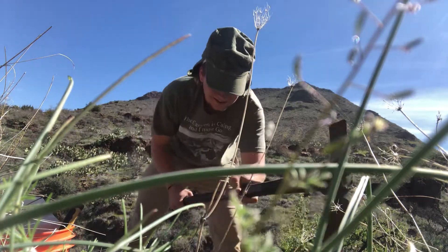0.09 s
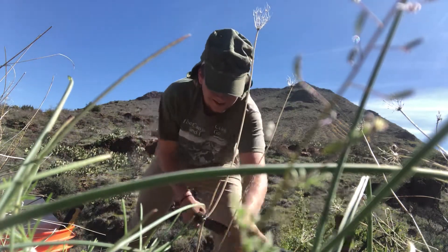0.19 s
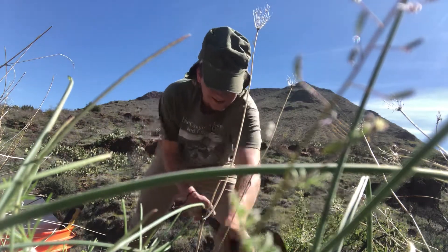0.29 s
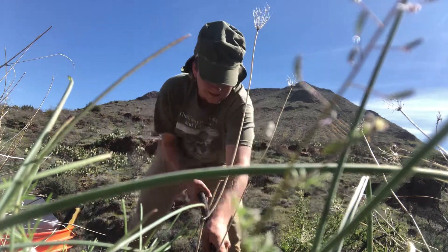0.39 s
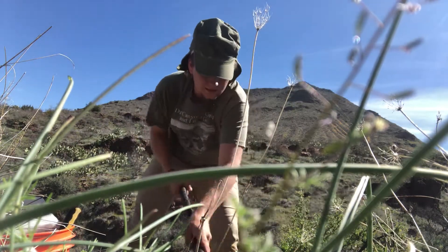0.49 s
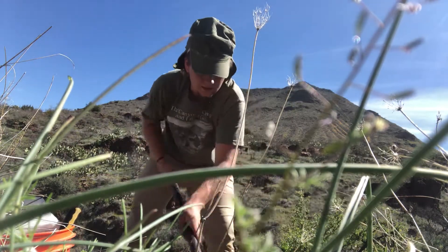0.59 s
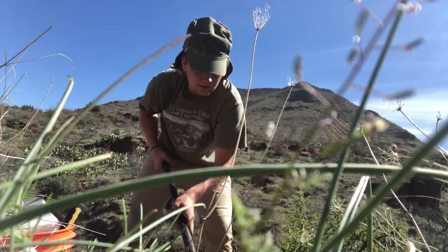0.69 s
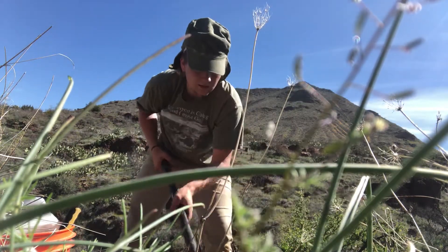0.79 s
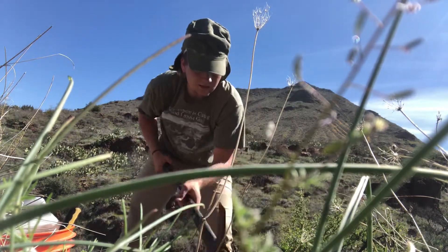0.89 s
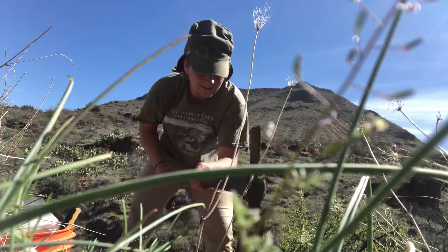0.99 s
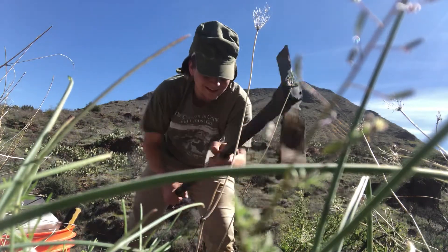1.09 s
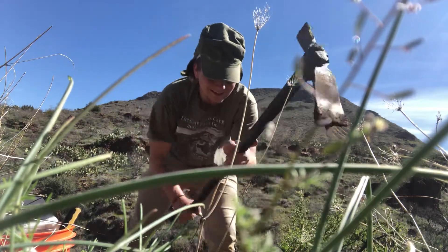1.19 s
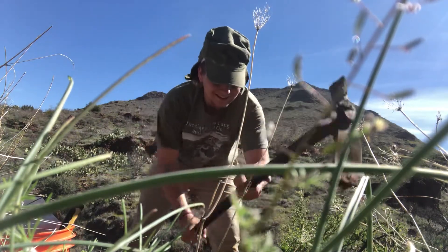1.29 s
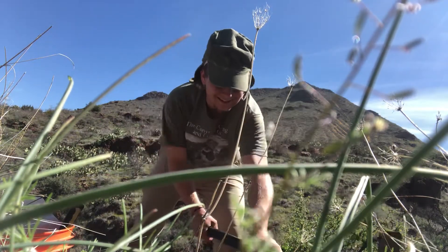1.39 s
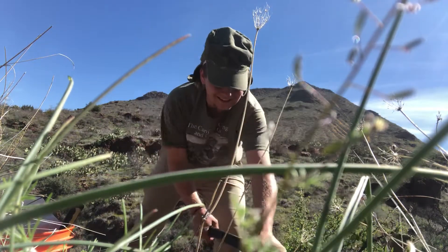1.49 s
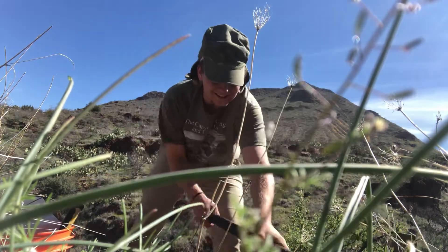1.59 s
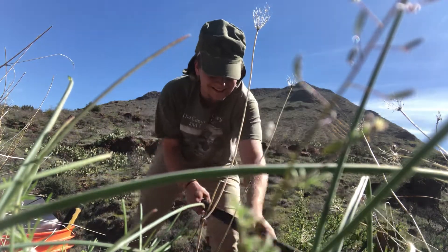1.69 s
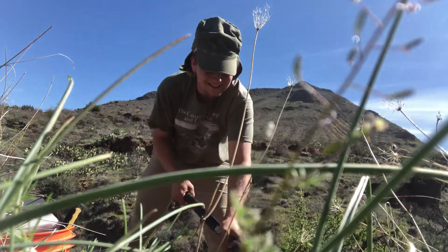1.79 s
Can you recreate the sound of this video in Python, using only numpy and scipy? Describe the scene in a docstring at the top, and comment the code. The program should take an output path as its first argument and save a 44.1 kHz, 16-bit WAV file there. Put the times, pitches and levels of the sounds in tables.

```python
"""Pick on stony ground

An open hillside in almost still air, the microphone close to the digging and a small bird far off.
A pick bites twice: noise bursts for the steel crack, damped sines for the thud, a slow swell for the shudder.
After each blow the blade drags through grit, made of dense tiny contacts that also ring its steel.
Loose stones knock as short bell-coloured bursts; the bird is a run of short arched sine notes.
"""
import sys
import numpy as np
from scipy import signal
from scipy.fft import rfft, irfft, next_fast_len
from scipy.io import wavfile

SR = 44100
rng = np.random.default_rng(int(sys.argv[2]) if len(sys.argv) > 2 else 0)


def persist_wave(psi):
    """Save psi, clipped to +-1, as 16-bit WAV."""
    counts = np.round(np.clip(psi, -1, 1) * 32767).astype(np.int16)
    wavfile.write(sys.argv[1], SR, np.atleast_2d(counts).T)


N = 79380  # samples, 1.8 s
T = np.arange(N) / SR  # time [s]


def amp(db):
    """Decibels to gain."""
    return 10 ** (np.asarray(db) / 20)


def unit(x):
    """Scale to rms 1."""
    return x / np.sqrt(np.mean(x ** 2) + 1e-20)


def spectrum(points):
    """Gain as a function of frequency, from (frequency [Hz], level [dB]) points on a log axis."""
    f, db = np.transpose(points)
    return lambda hz: amp(np.interp(np.log(hz), np.log(f), db))


def bell(hz, octaves):
    """Gain as a function of frequency: a bell around one pitch."""
    return lambda f: np.exp(-.5 * (np.log2(f / hz) / octaves) ** 2)


def filtered(x, response):
    """Shape x by a gain that depends on frequency, padded so that nothing wraps round."""
    m = next_fast_len(N + SR // 2)
    gain = response(np.fft.rfftfreq(m, 1 / SR) + 1)  # 1 Hz up, to avoid log(0)
    return irfft(rfft(x, m) * gain, m)[:N]


def coloured(x, points):
    """Give x a spectral colour and scale it to rms 1."""
    return unit(filtered(x, spectrum(points)))


def struck(s, rise, t60):
    """Envelope of a contact: quick rise, then a decay of 60 dB per t60 seconds."""
    t = np.maximum(T - s, 0)
    return (1 - np.exp(-t / rise)) * np.exp(-np.log(1000) * t / t60)


def swell(s, spread):
    """Bell-shaped envelope; the spread is its standard deviation in seconds."""
    return np.exp(-.5 * ((T - s) / spread) ** 2)


def burst(response, envelope):
    """Short noise burst of a given colour, with the envelope's energy."""
    half_envelope = np.sqrt(envelope)
    z = rfft(rng.standard_normal(N) * half_envelope)
    flat = z / (np.abs(z) + 1e-12)  # keep the random phases, level the magnitudes
    gain = response(np.fft.rfftfreq(N, 1 / SR) + 1)
    x = irfft(flat * gain, N) * half_envelope
    return unit(x) * np.sqrt(np.mean(envelope ** 2))


def grains():
    """Dense tiny contacts, each with its own pitch and size, partly in clumps."""
    z = signal.stft(rng.standard_normal(N), nperseg=128)[2]
    single_db = 6.5 * np.clip(rng.standard_normal(z.shape), -2, 2)
    clump_db = 3.5 * rng.standard_normal(z.shape[1])  # shared by grains that break together
    return signal.istft(z * amp(single_db + clump_db))[1][:N]


# Colour of the quiet hillside air: (frequency [Hz], level [dB])
AIR_COLOUR = [(15, -45.5), (25, -23.5), (76, -1), (166, -3.5), (200, -10), (236, -0.5), (256, -8),
              (326, -13), (354, -6), (1890, -23.5), (4870, -23), (8360, -28.5), (16000, -33)]
# Slow course of the air: (time [s], level [dB])
AIR_LEVEL = [(0, -63), (.2, -60), (.7, -60.5), (1.0, -65.5), (1.25, -65.5), (1.45, -61), (1.8, -62.5)]
# Dry stalks and trickling dirt: (centre time [s], level [dB], spread [s])
RUSTLES = [(0.012, -59.5, 0.019), (0.107, -57, 0.023), (0.921, -63.5, 0.018), (1.303, -63, 0.018)]
# Colour of the rustles: (frequency [Hz], level [dB])
RUSTLE_COLOUR = [(100, -9), (500, 4.5), (1500, -4), (4000, -8.5), (8000, -16.5), (16000, -21.5)]
# Faint high whispers: (centre time [s], level [dB], spread [s], frequency [Hz])
WHISPERS = [(1.124, -71, 0.031, 5150), (1.306, -65, 0.021, 6530)]


def hillside():
    """Air as steady coloured noise, rustles as swelling grains, whispers as swelling narrow noise."""
    air_level = amp(np.interp(T, *np.transpose(AIR_LEVEL)))
    out = air_level * coloured(rng.standard_normal(N), AIR_COLOUR)
    rustle_level = sum(amp(db) * swell(s, spread) for s, db, spread in RUSTLES)
    out += rustle_level * coloured(grains(), RUSTLE_COLOUR)
    for s, db, spread, hz in WHISPERS:
        whisper = unit(filtered(rng.standard_normal(N), bell(hz, octaves=0.33)))
        out += amp(db) * swell(s, spread) * whisper
    return out


# Far-off bird, mostly alternating high and low: (time [s], top frequency [Hz], level [dB])
BIRD_NOTES = [(1.474, 4750, -67), (1.486, 3990, -69), (1.501, 4900, -70), (1.514, 4150, -61.5),
              (1.530, 4950, -71), (1.544, 4160, -62), (1.560, 4670, -61), (1.573, 4100, -60),
              (1.588, 4700, -69), (1.762, 4750, -60), (1.775, 4220, -58)]
NOTE_SPREAD_S, NOTE_ARCH_HZ = 0.0029, 81.6  # bell spread; pitch drop at one spread from the middle


def bird():
    """Short sine notes whose pitch arches up to the middle and falls again."""
    out = np.zeros(N)
    for s, hz, db in BIRD_NOTES:
        arch = np.minimum(((T - s) / NOTE_SPREAD_S) ** 2, 10)
        pitch = hz - NOTE_ARCH_HZ * arch
        out += amp(db) * swell(s, NOTE_SPREAD_S) * np.sin(2 * np.pi * np.cumsum(pitch) / SR)
    return out


SLOPE_DB, SLOPE_T60_S = -38, .25


def slope_scatter(x):
    """Weak, dull answer from the rough slope: the digging convolved with decaying noise."""
    colour = [(60, -1), (500, -1.5), (2000, -9.5), (12000, -19.5)]  # (frequency [Hz], level [dB])
    tail = coloured(rng.standard_normal(N), colour) * struck(0, 0.0033, SLOPE_T60_S)
    return amp(SLOPE_DB) * signal.fftconvolve(x, tail / np.linalg.norm(tail))[:N]


# Steel modes of the blade: (frequency [Hz], relative level [dB], t60 [s])
BLADE_MODES = [(3000, -6.5, 0.049), (3520, -4, .035), (4540, -3, .045), (5380, 0, 0.042), (5830, -5, .04),
               (7620, -5.5, 0.041)]
CONTACT_RISE_S = 0.00038  # steel or grit contact


def scrape(rows, grit_colour, grit_db, earth_colour, earth_db, ring_db):
    """Grit grinds along the blade and rings it, over the duller crunch of earth."""
    s, *levels = np.transpose(rows)
    # near silence outside the stroke
    grit_level, earth_level = [amp(np.interp(T, s, db, left=-120, right=-120)) for db in levels]
    contacts = grains()
    steel = np.zeros(N)
    for hz, db, t60 in BLADE_MODES:
        steel += amp(db) * np.sin(2 * np.pi * hz * T) * struck(0, CONTACT_RISE_S, t60)
    ringing = unit(signal.fftconvolve(contacts, steel)[:N])
    grit = unit(coloured(contacts, grit_colour) + amp(ring_db) * ringing)
    earth = coloured(grains(), earth_colour)
    return amp(grit_db) * grit_level * grit + amp(earth_db) * earth_level * earth


# Raking stroke, levels before the stroke's trim: (time [s], grit level [dB], earth level [dB])
RAKE_STROKE = [(1.585, -77, -105), (1.603, -54, -40), (1.623, -61.5, -58), (1.639, -43.5, -47),
               (1.651, -65, -54), (1.661, -49, -49), (1.677, -51.5, -44.5), (1.691, -44, -47),
               (1.699, -48.5, -48.5), (1.709, -53.5, -57.5), (1.725, -45.5, -30.5), (1.739, -60, -58),
               (1.749, -47, -47), (1.761, -68, -66), (1.781, -63, -62), (1.793, -50, -47.5),
               (1.8, -55, -47)]
# Colours of the raked grit and earth: (frequency [Hz], level [dB])
RAKE_GRIT = [(710, -13.5), (1200, -5), (1770, -10.5), (2450, -8), (2650, -12), (4360, -5), (8720, -26.5),
             (9930, -15), (11100, -70), (14200, -33), (16000, -50)]
RAKE_EARTH = [(60, -22), (200, -7.5), (500, -0.5), (1000, -1), (1500, -3.5), (3000, -26.5)]


def raking():
    """After the second blow the blade rakes through the grit."""
    return scrape(RAKE_STROKE, RAKE_GRIT, -0.5, RAKE_EARTH, -2.5, ring_db=-13.5)


# Three levering strokes, levels before the trim: (time [s], grit level [dB], earth level [dB])
LEVER_STROKES = [
    [(0.255, -64.5, -58.5), (0.273, -55.5, -34.5), (0.283, -53, -47), (0.289, -43.5, -43.5),
     (0.301, -45, -31.5), (0.309, -38.5, -29.5), (0.321, -33.5, -25), (0.329, -42, -32),
     (0.337, -62.5, -45), (0.345, -39, -41), (0.351, -37, -22.5), (0.365, -65, -49.5), (0.37, -65, -43)],
    [(0.37, -57, -49), (0.394, -31.5, -38.5), (0.404, -33.5, -36), (0.418, -63, -50), (0.428, -56, -55),
     (0.45, -51.5, -32.5), (0.472, -44.5, -33), (0.484, -65.5, -54), (0.51, -55, -54)],
    [(0.51, -72, -66), (0.526, -89, -58), (0.538, -48, -53), (0.55, -58.5, -54), (0.576, -53, -51),
     (0.588, -54, -36.5), (0.606, -65, -55.5), (0.618, -92, -59), (0.628, -44.5, -44), (0.67, -71, -52.5),
     (0.698, -63, -59), (0.712, -62, -36.5), (0.724, -89, -49), (0.76, -75, -64)],
]
# Colours of the levered grit and earth: (frequency [Hz], level [dB])
LEVER_GRIT = [(710, -25.5), (1200, -4.5), (2650, -17.5), (2950, -10.5), (3950, -16), (4360, -10.5),
              (4910, -16.5), (5350, -12), (6650, -26), (7570, -20), (8440, -35), (9510, -25.5),
              (16000, -43)]
LEVER_EARTH = [(60, -7), (150, 1.5), (450, 7.5), (1200, -5.5), (1800, -10), (3000, -40)]


def levering():
    """The blade levers out the first clod, ringing less freely with each stroke."""
    out = np.zeros(N)
    for stroke, ring_db in zip(LEVER_STROKES, (0, -5.5, -10)):
        out += scrape(stroke, LEVER_GRIT, -2, LEVER_EARTH, -4.5, ring_db)
    return out


# Loose stones knocking: (time [s], level [dB], pitch [Hz], bell width [octaves], t60 [s])
STONE_KNOCKS = [(0.0528, -48, 700, 0.6, 0.029), (0.096, -44, 530, 0.69, 0.077),
                (0.1139, -14, 630, 0.45, 0.011), (0.1146, -32.5, 370, 0.52, 0.026),
                (0.122, -46, 497, 0.57, 0.2), (.266, -26.5, 620, 0.44, 0.027),
                (0.273, -28.5, 764, 0.21, 0.025), (0.2882, -28.5, 1090, 0.66, 0.024),
                (0.289, -33.5, 503, 0.16, 0.16), (0.3247, -23, 504, 0.083, 0.053),
                (.351, -34, 330, 0.32, 0.026), (0.447, -23, 930, 0.82, 0.017),
                (0.4609, -20.5, 1100, 0.57, 0.016), (0.471, -25.5, 800, .8, 0.013),
                (0.589, -35.5, 810, 0.41, 0.014), (0.627, -36.5, 643, 0.33, 0.055),
                (0.709, -31, 1860, 0.46, 0.022), (0.7095, -33, 608, 0.39, 0.025),
                (0.74, -48.5, 500, 0.36, 0.029), (0.865, -47.5, 219.3, .7, 0.04),
                (1.636, -43, 1314, 0.72, 0.067), (1.673, -34.5, 1000, 0.47, .025),
                (1.719, -53, 940, 0.42, 0.02)]
# Grit snapping on the steel: (time [s], level [dB])
GRIT_SNAPS = [(.2885, -32), (.3095, -26), (.3465, -21), (0.3951, -23), (.4485, -33), (.4612, -37),
              (.4705, -33), (.5625, -50), (.5872, -30.5), (0.6283, -39), (0.691, -44), (1.6875, -55),
              (1.7246, -42), (1.7465, -55)]


def stones():
    """Dull knocks are noise bursts around one pitch; snaps are bursts in the colour of grit."""
    out = np.zeros(N)
    for s, db, hz, width, t60 in STONE_KNOCKS:
        out += amp(db) * burst(bell(hz, width), struck(s, rise=0.0014, t60=t60))
    for s, db in GRIT_SNAPS:
        out += amp(db) * burst(spectrum(LEVER_GRIT), struck(s, CONTACT_RISE_S, t60=0.012))
    return out


# Different stone under each blow, one crack colour per blow: (frequency [Hz], level [dB])
CRACK_COLOURS = [
    [(200, -23), (900, -13.5), (1500, -13.5), (1950, -7), (2300, -3.5), (2700, -24), (3100, -15.5),
     (3500, 6), (3850, -10.5), (4400, -4), (6200, -1), (7000, -18.5), (7500, 1), (8100, -3.5),
     (8700, -19.5), (10000, -17.5), (12500, -28), (16000, -34.5)],
    [(200, -8), (900, 3), (1300, 8), (1600, -7.5), (2400, 0), (2900, -18), (3300, -8), (4000, -3.5),
     (4700, 1), (5300, -17), (6300, -9.5), (7400, -14.5), (8400, -27.5), (9800, -17), (12000, -19.5),
     (16000, -34)],
]
# Dirt spraying from the blade: (frequency [Hz], level [dB])
CRUMB_COLOUR = [(300, 1), (1500, -3), (5000, -8), (9000, -13.5), (16000, -22.5)]
SPLIT_DB, SPLIT_T60_S = -15.5, 0.033  # relative to the crack
CRUMBLE_DB, CRUMBLE_T60_S = -32.5, 0.18  # relative to the crack
GRAZE_DB, GRAZE_SPREAD_S = -21, 0.0011  # relative to the crack
SOIL_RISE_S = 0.00094


def crack(s, db, t60, colour):
    """Steel on stone: a bright burst and longer splitting, with topsoil cut by the tip and sprayed dirt."""
    splitting = amp(SPLIT_DB) * struck(s, CONTACT_RISE_S, SPLIT_T60_S)
    contact = struck(s, CONTACT_RISE_S, t60) + splitting
    out = burst(spectrum(colour), contact)
    out += amp(GRAZE_DB) * swell(s, GRAZE_SPREAD_S) * coloured(grains(), colour)
    spray = struck(s, SOIL_RISE_S, CRUMBLE_T60_S) * coloured(grains(), CRUMB_COLOUR)
    return amp(db) * (out + amp(CRUMBLE_DB) * spray)


# Modes of the blade lodged in soil: (frequency [Hz], level before tilt and thud level [dB], t60 [s])
THUD_MODES = [(137.3, -11.5, 0.083), (255, -4, 0.038), (355, -2.5, .026), (520, -9.5, 0.037),
              (625, -4, 0.034), (882, -5, 0.025), (1225, -10, 0.026)]
# Earth packing under the blade: (frequency [Hz], level [dB])
CRUNCH_COLOUR = [(80, -16), (200, 1), (400, 4), (550, -5), (950, 0), (1400, -8.5), (2200, -17),
                 (4000, -34.5)]
CRUNCH_DB, CRUNCH_T60_S = -1, .022  # relative to the thud


def thud(stop, db, tilt):
    """The blade stops dead in the soil: packing earth crunches and damped modes ring briefly."""
    out = amp(CRUNCH_DB) * burst(spectrum(CRUNCH_COLOUR), struck(stop, SOIL_RISE_S, CRUNCH_T60_S))
    pivot_hz = THUD_MODES[2][0]
    for k, (hz, mode_db, t60) in enumerate(THUD_MODES):
        sign = (-1) ** k
        ring = sign * np.sin(2 * np.pi * hz * (T - stop)) * struck(stop, SOIL_RISE_S, t60)
        out += amp(mode_db + tilt * np.log2(hz / pivot_hz)) * ring
    return amp(db) * out


SHUDDER_HZ = 58.5


def shudder(s, length):
    """A few slow cycles of the ground, swelling to a peak at 0.35 of the length and dying away."""
    u = np.maximum(T - s, 0) / (0.35 * length)
    return (u * np.exp(1 - u)) ** 3 * np.sin(2 * np.pi * SHUDDER_HZ * (T - s))


# Soil shifting under the blade: (time [s], level [dB], length [s])
SOIL_HEAVES = [(.14, -58.5, 0.047), (0.367, -35.5, 0.017), (0.406, -36, 0.024), (0.477, -46.5, 0.046),
               (0.578, -60, 0.068), (1.734, -48, .045)]


def heaves():
    """Shifting soil sways in the same slow cycles as the shudder."""
    return sum(amp(db) * shudder(s, length) for s, db, length in SOIL_HEAVES)


# Blows of the pick: (time [s], crack level [dB], crack t60 [s], thud level [dB],
# thud tilt [dB/octave], thud delay [s], shudder level [dB], shudder delay [s], shudder length [s])
PICK_BLOWS = [(0.2159, -7, 0.01, -6.5, 1, 0.0014, -24.5, .015, .045),
              (1.397, -10, 0.016, -14, 0, .0018, -22.5, 0.0196, 0.03)]


def blows():
    """Each blow cracks on stone, thuds as the soil stops the blade, then shakes the ground."""
    out = np.zeros(N)
    for blow, colour in zip(PICK_BLOWS, CRACK_COLOURS):
        s, crack_db, crack_t60, thud_db, tilt, thud_delay, shudder_db, shudder_delay, length = blow
        out += crack(s, crack_db, crack_t60, colour)
        out += thud(s + thud_delay, thud_db, tilt)
        out += amp(shudder_db) * shudder(s + shudder_delay, length)
    return out


def scene():
    """Digging close by, the hillside and the bird behind it."""
    dig = raking() + levering() + stones() + heaves() + blows()
    return (hillside() + bird() + slope_scatter(dig) + dig)[None]


CEILING = .88  # full scale is 1
TOP_HZ, TOP_EDGE_HZ = 16500, 900  # upper band limit and the width of the slope below it


def record(dry):
    """The microphone chain sheds the deepest bass, rounds high peaks and stops at its band limit."""
    bass_cut = signal.butter(4, 36, "highpass", fs=SR, output="sos")
    x = signal.sosfilt(bass_cut, dry[0])
    x = x / (1 + np.abs(x / CEILING) ** 6) ** (1 / 6)
    return filtered(x, lambda hz: np.clip((TOP_HZ - hz) / TOP_EDGE_HZ, 0, 1))[None]


dry = scene()
out = record(dry)
persist_wave(out)
```